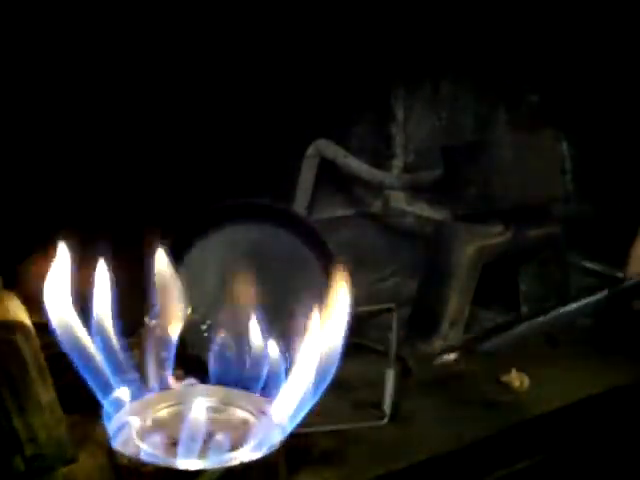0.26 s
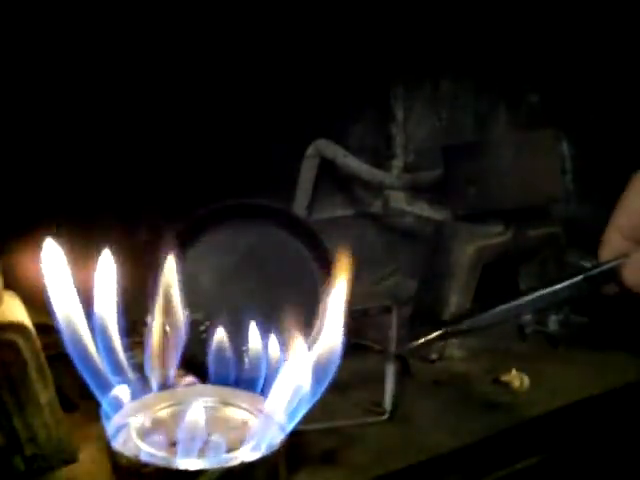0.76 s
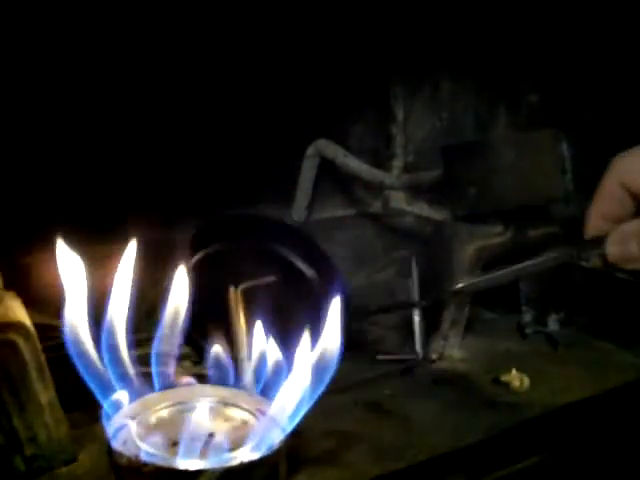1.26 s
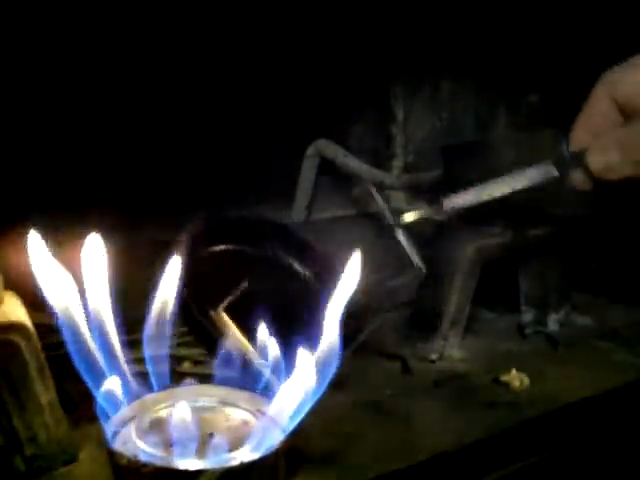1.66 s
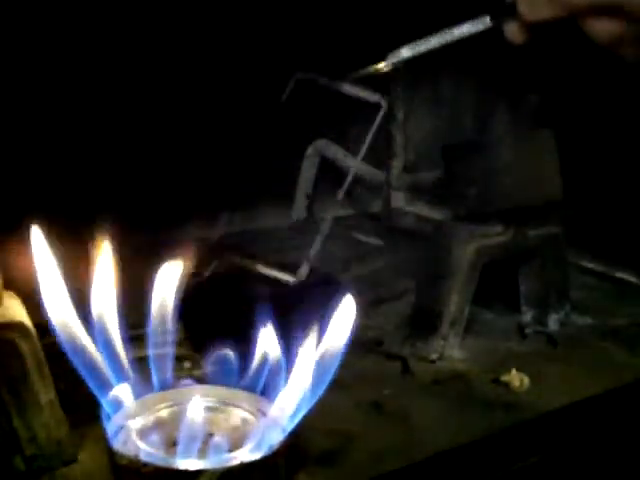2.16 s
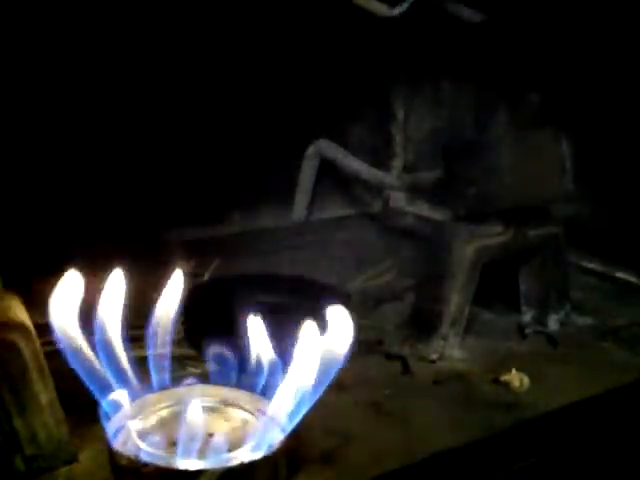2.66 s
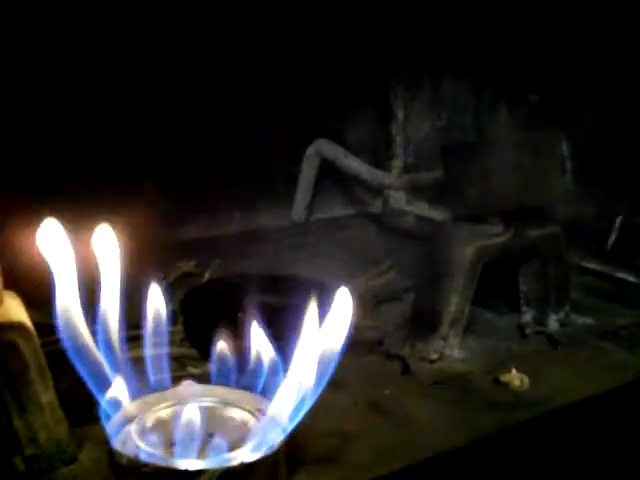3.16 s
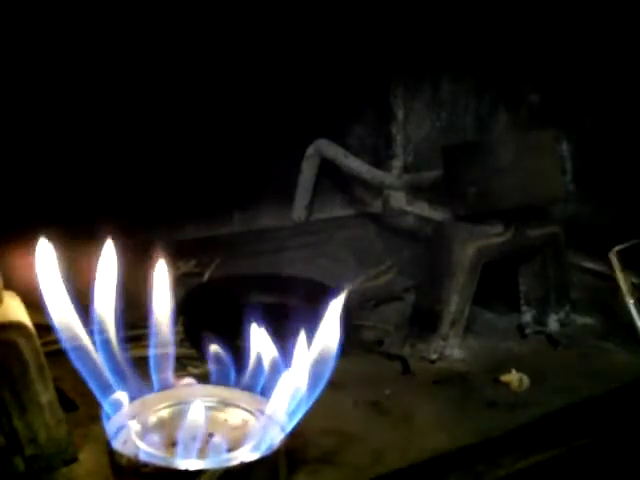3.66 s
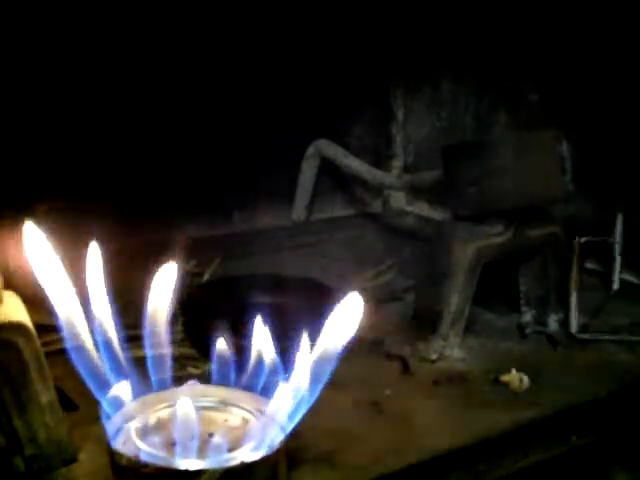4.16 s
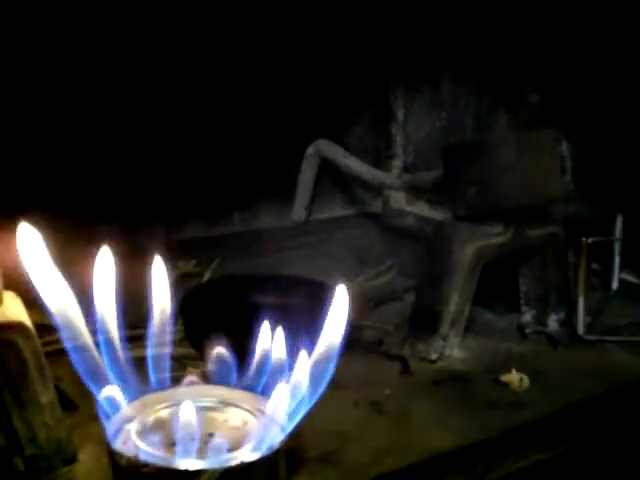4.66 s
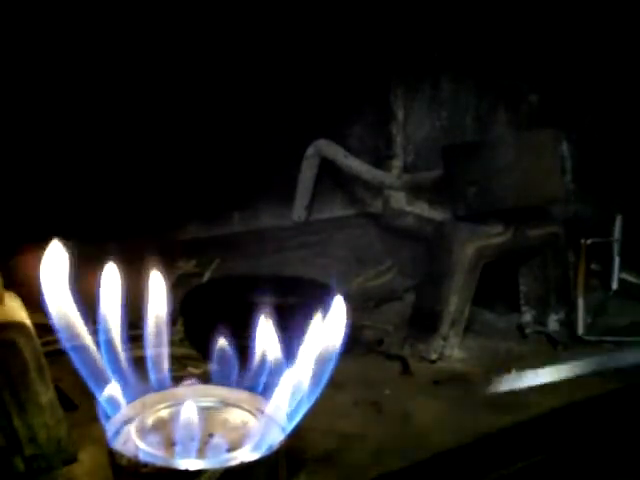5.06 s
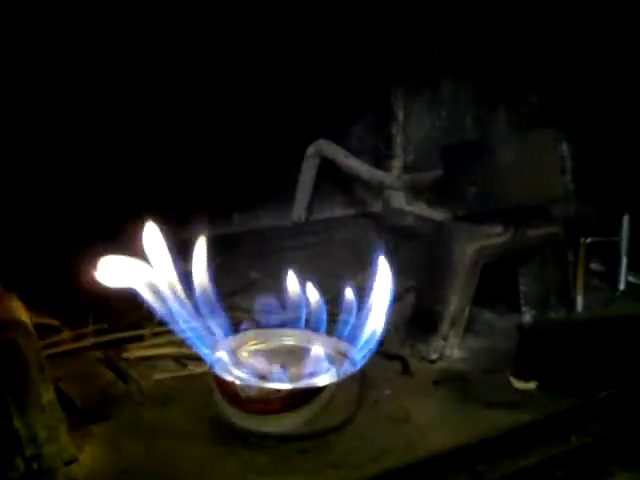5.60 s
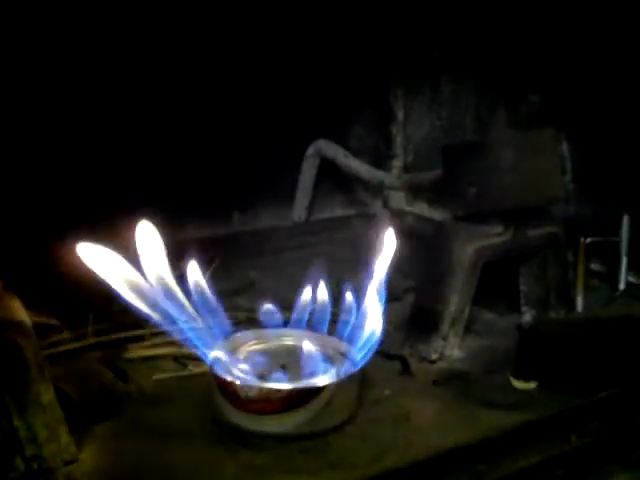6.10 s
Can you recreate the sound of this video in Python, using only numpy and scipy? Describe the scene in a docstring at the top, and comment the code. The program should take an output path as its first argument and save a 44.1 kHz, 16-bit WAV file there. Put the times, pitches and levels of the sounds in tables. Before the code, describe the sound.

In a small quiet workshop, a soft flame rush and faint hum run throughout. Close by, steel tweezers scrape and tick on a small metal cup, which falls back with a short bouncing clink, then again, louder and brighter. After that come woody knocks, sharp steel clicks, dull slides and a brief wire rattle as tools are set down on a bench. It ends almost still.

```python
"""A soft, steady rush of flame and room air with a faint hum; then steel tweezers scrape and tip a small metal cup
beside a homemade stove. Twice the cup falls back, clinks and rocks: damped sine modes with a noise clank.
Tweezers and a wire stand are then put down on a wooden bench with knocks, clicks and slides: coloured
noise bursts, modes of bench and tweezers, and trains of random grains, in a small workshop."""
import sys
import numpy as np
from scipy import signal
from scipy.fft import rfft, irfft
from scipy.io import wavfile

SR = 44100
rng = np.random.default_rng(int(sys.argv[2]) if len(sys.argv) > 2 else 0)


def pcm_store(signal):
    """Save signal as 16-bit PCM."""
    levels = np.round(np.clip(np.atleast_2d(signal), -1, 1) * 32767)
    wavfile.write(sys.argv[1], SR, levels.astype(np.int16).T)


N = 279359

# Modes of the cup's wall: f/Hz
CUP_MODE_HZ = np.array([701, 768, 1051, 1225, 1359, 1512, 1644, 1813, 2008, 2146, 2167, 2336, 2544, 3095, 3335, 3520, 4187, 4504, 5477, 5842, 6929, 7369, 9180, 9388, 11143])
# The same modes in order: level/dB, undisturbed t60/s, side of the rim where most easily struck (about -1..1)
CUP_MODES = [(-6, 0.76, 0.043), (-23.5, 0.66, 0.77), (-22, 0.21, 0.58), (-8.5, 0.24, -0.033), (-32, .25, 0),
             (-27.5, 0.2, -0.84), (-12.5, 0.13, -0.44), (-20, 0.14, 0.22), (-7, 0.12, 1), (-7, 0.25, 1),
             (7.5, 0.097, 0.16), (-7.5, 0.095, 0.33), (-19, 0.3, 0.17), (-2, 0.15, 0.89), (-29, 0.18, 0.68),
             (-45.5, 0.17, -0.079), (-16, 0.22, -0.78), (-16.5, 0.32, .7), (-21.5, 0.33, 0.047),
             (-30.5, 0.48, -1.3), (-2.5, 0.16, -0.36), (-0.5, 0.12, .9), (-18, .25, 0), (-7.5, 0.26, 0.34),
             (-13.5, 0.32, 0.85)]
# The cup tips over and falls on its support: t/s, level/dB, brightness f/Hz
CUP_FALLS = [(.9235, -27, 2570), (2.032, -20.5, 4200)]
# Landing and three bounces of every fall: t/s after the fall, ring level/dB and clank level/dB (both relative
# to the fall), lowest-mode lift/dB, lean to one side of the rim/dB
CUP_BOUNCES = [(0, 0.5, -0.5, 1.5, 8.5), (.042, 0.5, -7, -1, 2.5), (.092, -7, -6, 11, -16),
               (.138, -3, -9.5, -16, -5.5)]
# The tweezers touch the cup: t/s, ring level/dB, clank level/dB, brightness f/Hz, lean to one side of the rim/dB
CUP_TOUCHES = [(.812, -48.5, -51.5, 4500, 1), (.856, -46, -46, 5370, 3), (1.27, -67, -55, 5000, -2),
               (1.499, -63, -54.5, 6000, 2), (1.822, -53, -56, 5000, -16), (1.853, -53, -44, 6000, 4),
               (1.916, -44, -51, 11000, 10.5), (1.935, -39, -68, 11000, -11),
               (1.962, -43.5, -39.5, 6800, 10)]
# Colour of the dense short clank of cup and support: f/Hz, relative level/dB
CLANK_COLOUR = [(30, -73), (120, -45.5), (260, -20.5), (450, -24.5), (700, -6), (950, -8.5), (1250, -1.5),
                (1750, -2.5), (2150, 4), (2600, -12), (3150, -0.5), (4100, -10), (5200, -15), (7000, -10),
                (12000, -13)]
# Tweezer tips scrape along the cup: start t/s, time until release t/s, level/dB
CUP_SCRAPES = [(.712, 0.02, -57), (.8, 0.49, -63), (1.52, 0.024, -62.5), (1.66, 0.35, -60),
               (1.812, .03, -44.5), (1.92, 0.054, -54.5)]
# Dull scraping strokes, the first of the tweezers on the cup, the later ones over the bench:
# start t/s, time until release t/s, level/dB
DULL_STROKES = [(.71, 0.1, -54), (2.25, 0.063, -51), (2.83, .17, -50)]
# Colour of the dull scraping: f/Hz, relative level/dB
DULL_COLOUR = [(40, -63), (250, -21.5), (600, -3), (950, 9), (1350, 7), (2100, -12.5), (3100, -17),
               (4500, -41), (12000, -46)]
# Knocks on the bench: t/s, level/dB, brightness f/Hz, main resonance f/Hz, its lift/dB, thud lift/dB,
# tweezers ring level/dB
BENCH_KNOCKS = [(2.297, -45, 1700, 1260, 19, -19, -82), (2.474, -52.5, 2210, 1390, 7, -15, -73),
                (2.597, -43, 2400, 1290, 5.5, -1, -76), (2.771, -33, 2360, 980, 16, -13.5, -85),
                (3.1278, -36, 2780, 2530, 9, -12.5, -53), (3.2368, -31, 7660, 1890, 18.5, -17, -35.5),
                (3.296, -41.5, 3300, 1760, 11, -8, -72), (3.383, -39, 11600, 1670, 7.5, -6, -60),
                (3.401, -38.5, 4900, 1260, 13.5, 3, -74), (3.58, -45, 3440, 1450, 13, -1, -77),
                (3.696, -35, 6900, 298, 2.5, 4, -77), (3.878, -25.5, 9500, 1290, 6.5, -4, -45),
                (4.049, -42, 7000, 3400, 8, 6, -66), (4.126, -44.5, 2510, 1290, 0, -1, -80),
                (4.234, -26.5, 7150, 1540, 10, -10.5, -38.5), (5.704, -56.5, 7200, 3480, 5, -5, -72),
                (6.31, -62, 7000, 3420, 6, -5, -80)]
# Colour of a knock on the bench: f/Hz, relative level/dB
KNOCK_COLOUR = [(30, -65), (100, -14.5), (160, -35.5), (250, -8.5), (420, -6.5), (800, -7.5), (1250, -4),
                (1550, -2.5), (2100, -18), (2700, -8.5), (3450, -5.5), (4400, -11.5), (5600, -13.5),
                (7300, -11.5), (9500, -15), (12500, -14)]
# Modes of the bench top and what lies on it: f/Hz, level/dB, t60/s
BENCH_MODES = [(897, -5, .3), (1250, -2, .22), (1447, -6, .25), (1513, -1, .35), (2580, -11, .15),
               (3220, -4, .15), (3830, -4, .14), (4470, -9, .14), (7280, -15, .1)]
# Modes of the tweezers: f/Hz, level/dB, t60/s
TWEEZER_MODES = [(1579, -2, .44), (2756, -15, .4), (3230, -3, .17), (5087, -9, .32), (6271, -13, .4),
                 (7089, -16, .32)]
# Decay of a blow, before its first moments are slightly slowed: f/Hz, t60/s
BLOW_DECAY = [(200, 0.47), (1400, .17), (3500, 0.11), (7000, 0.099), (12000, 0.061)]
# The wire stand rattles as it settles: start t/s, time until release t/s, level/dB
STAND_RATTLE = (3.945, 0.12, -44.5)
# Sharp ticks of steel on steel: t/s, level/dB
STEEL_TICKS = [(.786, -50), (0.834, -49.5), (.853, -47), (1.433, -54), (1.964, -44), (2.098, -42),
               (2.227, -56), (3.133, -31.5), (3.149, -38.5), (3.410, -42.5), (3.695, -44.5), (5.55, -63)]
# Colour of a tick: f/Hz, relative level/dB
TICK_COLOUR = [(1000, -25), (3000, -7), (5200, -3), (7200, 0), (9000, -4), (10500, -5), (12500, -14)]
# The sleeve rustles as the arm lifts: start t/s, time until release t/s, level/dB
SLEEVE_RUSTLE = (1.1, 0.66, -61.5)
# Decay of the workshop's diffuse tail: f/Hz, t60/s
ROOM_DECAY = [(200, 0.42), (1200, 0.37), (3500, 0.33), (10000, 0.21)]
# Colour of flame and room air: f/Hz, relative level/dB
AIR_COLOUR = [(25, -42), (55, -21.5), (92, -21.5), (139, -10), (220, -11.5), (350, -4.5), (500, -9),
              (700, -9), (950, -6), (1200, -12), (1550, -10.5), (2100, -18), (2900, -22.5), (3500, -25.5),
              (4500, -28.5), (7000, -30.5), (12500, -36)]
# Faint hum in the workshop: f/Hz, level/dB
WORKSHOP_HUM = [(404, -76), (545, -69.5), (780.6, -71.5), (1513, -80), (1680, -78)]

T = np.arange(SR // 2) / SR  # time axis of one event, s
HZ = np.fft.rfftfreq(len(T), 1 / SR)
CLOCK = np.arange(N) / SR  # time axis of the scene, s

DULLING = 0.045  # share of brightness lost with each bounce
TOUCH_LOW_DB = 9.5  # a touch on the rim favours the lowest mode
SETTLE_S, SETTLE_DB_PER_S = 0.055, 107.5  # soon after a contact the support damps the cup
SCRAPE_RING_DB = -6.5  # ring of the wall, relative to the grit
SCRAPE_T60_S = 0.11  # the pressing tips damp every mode
BENCH_RING_DB = -10  # relative to the knock
DEPTH_DB = 3.5  # unevenness of a blow's colour
STROKE_ATTACK_S, STROKE_RELEASE_S = 0.016, 0.052
RATTLE_ATTACK_S, RATTLE_RELEASE_S = 0.023, 0.055
RUSTLE_ATTACK_S, RUSTLE_RELEASE_S = 0.29, 0.35
FAINT_TICKS, FAINT_TICK_DB, FAINT_SPREAD_DB = 9, -58, 1.5  # stray ticks while the tweezers are at work
HANDLING_S = (.6, 3.2)  # from, to
AIR_DB = -58.5
EDGE_HZ = 12550


def cup():
    """Modal superposition: each contact excites modes by its place on the rim and chokes what still rings."""
    mode_db, t60, side = np.transpose(CUP_MODES)
    modes = np.column_stack([CUP_MODE_HZ, mode_db, t60])
    lowest = CUP_MODE_HZ == CUP_MODE_HZ.min()
    hits = contacts()
    next_times = [row[0] for row in hits[1:]] + [N / SR]
    out = np.zeros(N)
    for (s, ring_db, clank_db, bright_hz, low_db, lean_db), next_s in zip(hits, next_times):
        weights = contact(CUP_MODE_HZ, bright_hz) * amp(lean_db * side + low_db * lowest)
        choke_db = -60 * np.maximum(T - (next_s - s), 0) / 0.06
        settle_db = -SETTLE_DB_PER_S * np.maximum(T - SETTLE_S, 0)
        ringing = weights @ ring(modes, rise=0.0098, s=s)
        add(out, s, amp(ring_db) * ringing * amp(choke_db + settle_db))
        clank_gain = amp(read(CLANK_COLOUR, HZ)) * contact(HZ, bright_hz)
        add(out, s, amp(clank_db) * blow(clank_gain, rise=0.00078, slowed_s=0.0076))
    return out


def contacts():
    """Successive impacts in order: t/s, ring/dB, clank/dB, brightness f/Hz, lowest mode/dB, lean/dB."""
    rows = []
    for s, ring_db, clank_db, bright_hz, lean_db in CUP_TOUCHES:
        rows.append((s, ring_db, clank_db, bright_hz, TOUCH_LOW_DB, lean_db))
    for s, db, bright_hz in CUP_FALLS:
        for k, (delay, ring_db, clank_db, low_db, lean_db) in enumerate(CUP_BOUNCES):
            bounce_hz = bright_hz * (1 - DULLING) ** k
            rows.append((s + delay, db + ring_db, db + clank_db, bounce_hz, low_db, lean_db))
    return sorted(rows)


def scrape():
    """Stick-slip friction: the tips make grit along the cup, and the damped wall rings faintly with it."""
    grit = grains(amp(read(CLANK_COLOUR, HZ)) * contact(HZ, 7100), per_s=220, spread_db=3.5)
    wall = ring([(hz, 0, SCRAPE_T60_S) for hz in CUP_MODE_HZ], rise=.004).sum(0)
    ringing = unit(signal.oaconvolve(np.diff(grit, prepend=0), wall)[:N])
    return strokes(CUP_SCRAPES) * (grit + amp(SCRAPE_RING_DB) * ringing)


def dull_scrape():
    """Stick-slip friction with little treble: a dense train of grains, on the cup and later over the bench."""
    return strokes(DULL_STROKES) * grains(amp(read(DULL_COLOUR, HZ)), per_s=680, spread_db=0.5)


def bench():
    """Impact excitation: each knock stresses a resonance and may ring the tweezers; the stand rattles."""
    out = np.zeros(N)
    board = waver(ring(BENCH_MODES, rise=.003))
    prongs = waver(ring(TWEEZER_MODES, rise=.005))
    board_hz, prong_hz = np.transpose(BENCH_MODES)[0], np.transpose(TWEEZER_MODES)[0]
    for s, db, bright_hz, main_hz, lift_db, thud_db, prong_db in BENCH_KNOCKS:
        peak_db = lift_db * np.exp(-(np.log2((HZ + 1) / main_hz) / 0.21) ** 2)
        low_db = thud_db / (1 + (HZ / 650) ** 4)
        colour_db = read(KNOCK_COLOUR, HZ) + peak_db + low_db + ragged(DEPTH_DB)
        knock = blow(amp(colour_db) * contact(HZ, bright_hz), rise=0.0019, slowed_s=0.019)
        add(out, s, amp(db) * knock)
        add(out, s, amp(db + BENCH_RING_DB) * (contact(board_hz, bright_hz) @ board))
        add(out, s, amp(prong_db) * (contact(prong_hz, 0.74 * bright_hz) @ prongs))
    rattle_gain = amp(read(KNOCK_COLOUR, HZ)) * contact(HZ, 6400) / (1 + HZ / 1200)
    rattle = grains(rattle_gain, per_s=380, spread_db=2.0)
    return out + stroke(*STAND_RATTLE, RATTLE_ATTACK_S, RATTLE_RELEASE_S) * rattle


def ticks():
    """Hard contact: steel tips meet in very short, bright clicks, a few clear ones and some faint strays."""
    out = np.zeros(N)
    strays = []
    for _ in range(FAINT_TICKS):
        strays.append((rng.uniform(*HANDLING_S), rng.normal(FAINT_TICK_DB, FAINT_SPREAD_DB)))
    for s, db in STEEL_TICKS + strays:
        colour = amp(read(TICK_COLOUR, HZ) + ragged(DEPTH_DB))
        envelope = amp(db - 60 * T / 0.051) * (1 - np.exp(-T / 0.0021))
        add(out, s, envelope * noise(colour, len(T)))
    return out


def rustle():
    """Friction of cloth as band-limited noise: a dull, soft rush as the arm lifts."""
    hz = np.fft.rfftfreq(N, 1 / SR)
    level = stroke(*SLEEVE_RUSTLE, RUSTLE_ATTACK_S, RUSTLE_RELEASE_S)
    return level * noise(contact(hz, 390) * (1 - contact(hz, 117)), N)


def room(x):
    """Diffuse reverberation: convolution with noise whose bands decay at their own rates."""
    tail = fade(rng.standard_normal(len(T)), ROOM_DECAY) * (1 - np.exp(-(T / 0.015) ** 2))
    return signal.oaconvolve(x, tail / np.linalg.norm(tail))[:N]


def air():
    """Stationary noise: the soft rush of flame and room, with narrow bands as a faint wavering hum."""
    hz = np.fft.rfftfreq(N, 1 / SR)
    rush = amp(AIR_DB) * noise(amp(read(AIR_COLOUR, hz)), N)
    hum = sum(amp(db) * noise(1 / (1 + ((hz - f) / 5.5) ** 2), N) for f, db in WORKSHOP_HUM)
    return rush + hum


def contact(hz, bright_hz):
    """Contact duration: a softer, longer contact excites less treble."""
    return 1 / np.sqrt(1 + (hz / bright_hz) ** 9.0)


def ring(modes, rise, s=0):
    """Free vibration: one dying sine a row, swelling as near echoes join; phase runs on from time s."""
    hz, db, t60 = np.transpose(modes)[:, :, None]
    decay = amp(db - 60 * T / t60)
    return decay * np.sin(2 * np.pi * hz * (T + s)) * (1 - np.exp(-T / rise))


def blow(gain, rise, slowed_s):
    """High modal density: crowded short modes with near echoes; a slightly slowed first decay, then a quick fall."""
    echo_lift = amp(62 * np.minimum(T, slowed_s))  # near echoes partly offset the decay, in dB a second
    return fade(noise(gain, len(T)), BLOW_DECAY) * echo_lift * (1 - np.exp(-T / rise))


def grains(gain, per_s, spread_db):
    """Random excitation: stick-slip clicks of uneven size, coloured by the body they excite."""
    happens = rng.random(N) < per_s / SR
    sign = rng.choice([-1, 1], N)
    size = amp(spread_db * np.minimum(rng.exponential(1, N), 3))
    body = noise(gain, len(T)) * amp(-60 * T / 0.091)
    return unit(signal.oaconvolve(happens * sign * size, body)[:N])


def ragged(depth_db):
    """Modal irregularity: peaks and dips a few hundred Hz wide, from unnamed modes that one spot favours."""
    window = signal.windows.hann(len(HZ) // 64)
    bumps = unit(signal.fftconvolve(rng.standard_normal(len(HZ)), window, "same"))
    return depth_db * bumps * HZ / (HZ + 2000)  # shallower in the bass


def waver(modes):
    """Interference: crossing echoes make each ringing mode swell and sink at random."""
    slow = [noise(contact(HZ, 40), len(T)) for _ in modes]
    return modes * (1 + .35 * np.array(slow))


def stroke(start, length, db, attack_s, release_s):
    """Envelope of one movement: linear build-up, hold, exponential decay."""
    attack = np.clip((CLOCK - start) / attack_s, 0, 1)
    release = np.exp(-np.maximum(CLOCK - start - length, 0) / release_s)
    return amp(db) * attack * release


def strokes(rows):
    """Superposition of the envelopes of a series of hand strokes."""
    return sum(stroke(*row, STROKE_ATTACK_S, STROKE_RELEASE_S) for row in rows)


def fade(x, decays):
    """Frequency-dependent damping: each band dies at its own speed."""
    hz, t, z = signal.stft(x, SR, nperseg=128)
    decay = amp(-60 * t / read(decays, hz)[:, None])
    return signal.istft(z * decay, SR, nperseg=128)[1][:len(x)]


def noise(gain, size):
    """Spectral shaping: white noise with the given gain per bin, scaled to rms 1."""
    return unit(irfft(rfft(rng.standard_normal(size)) * gain, size))


def read(points, hz):
    """Linear interpolation of a table on a log-frequency axis."""
    f, value = np.transpose(points)
    return np.interp(np.log(hz + 1), np.log(f), value)


def amp(db):
    """Logarithmic level: decibels to amplitude gain."""
    return 10 ** (np.asarray(db) / 20)


def unit(x):
    """Normalization to rms 1."""
    return x / np.sqrt(np.mean(abs(x) ** 2) + 1e-20)


def add(mix, s, sound):
    """Linear superposition: mixes a sound in at time s."""
    part = mix[round(s * SR):][:len(sound)]
    part += sound[:len(part)]


def scene():
    """Superposition of handling sounds, their reverberation and steady air; small objects radiate no deep bass."""
    no_bass = signal.butter(3, 95, "highpass", fs=SR, output="sos")
    near = signal.sosfilt(no_bass, cup() + scrape() + dull_scrape() + bench() + ticks())
    return (near + amp(-16.0) * room(near) + rustle() + air())[None]


def record(dry):
    """Band limitation: a linear-phase low-pass removes the treble above EDGE_HZ."""
    lowpass = signal.firwin(511, EDGE_HZ, window=("kaiser", 8), fs=SR)
    return signal.oaconvolve(dry, lowpass[None], "same")


dry = scene()
out = record(dry)
pcm_store(out)
```